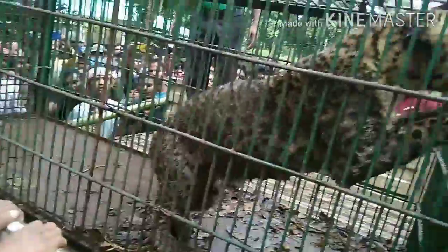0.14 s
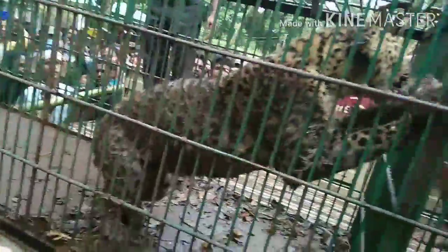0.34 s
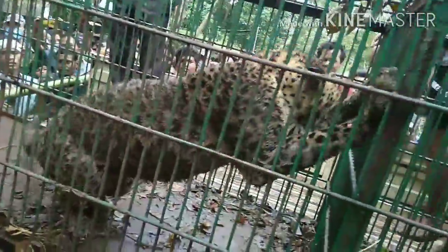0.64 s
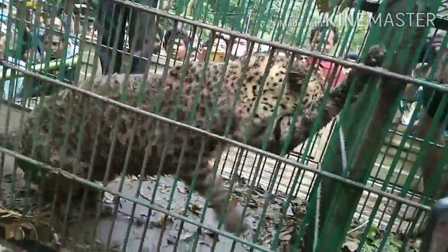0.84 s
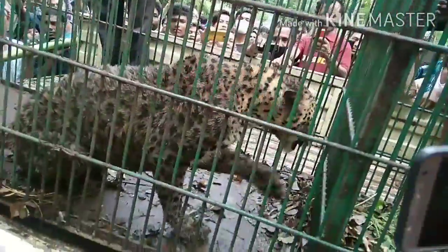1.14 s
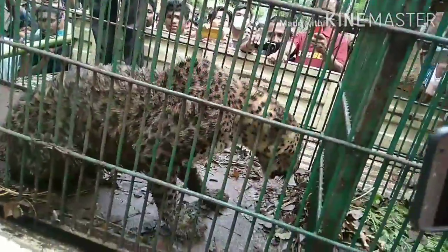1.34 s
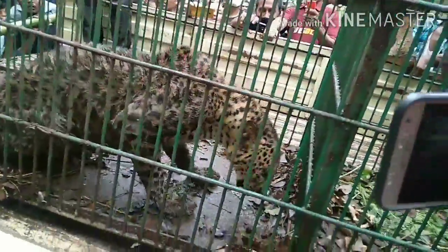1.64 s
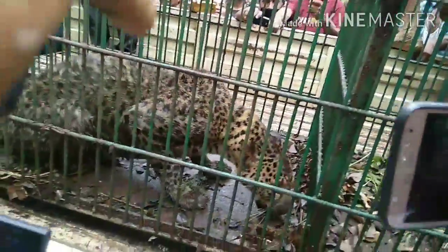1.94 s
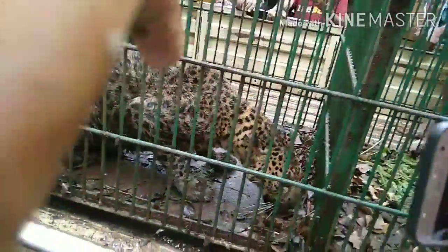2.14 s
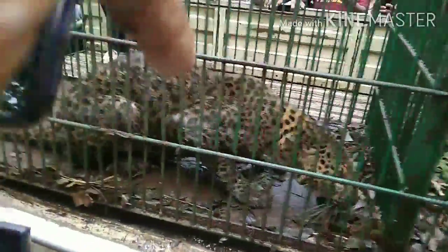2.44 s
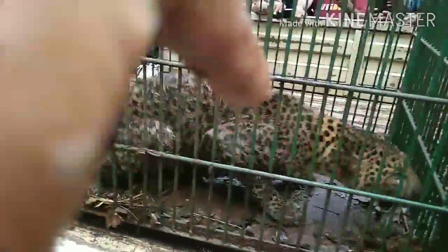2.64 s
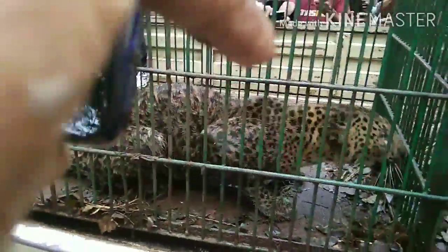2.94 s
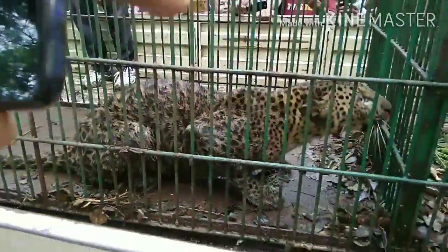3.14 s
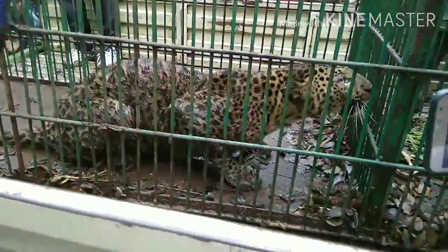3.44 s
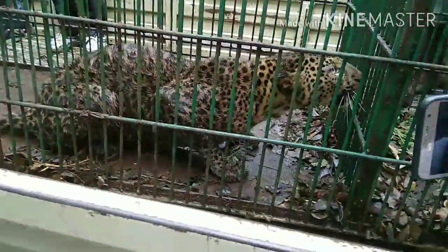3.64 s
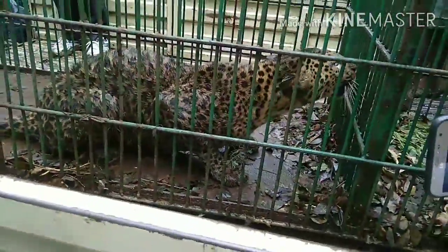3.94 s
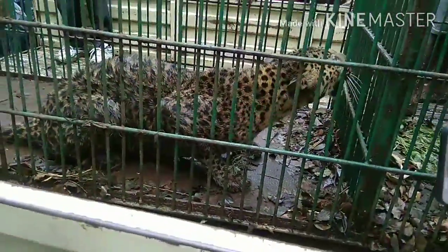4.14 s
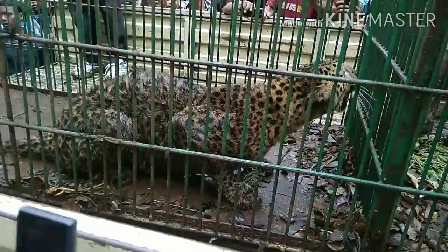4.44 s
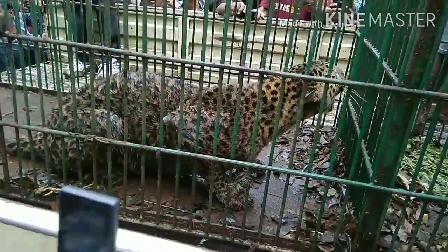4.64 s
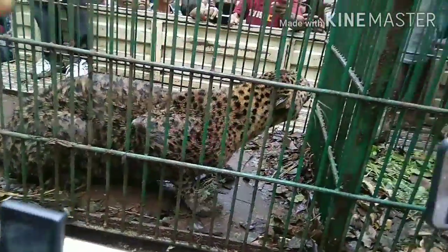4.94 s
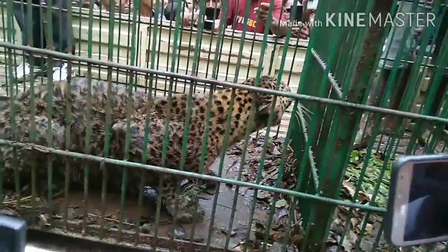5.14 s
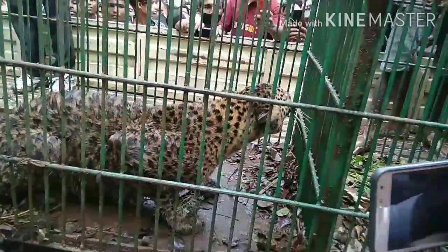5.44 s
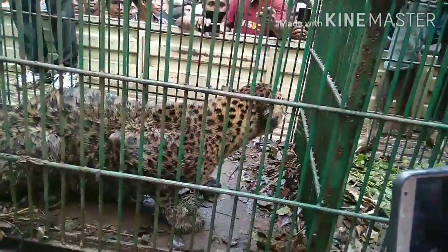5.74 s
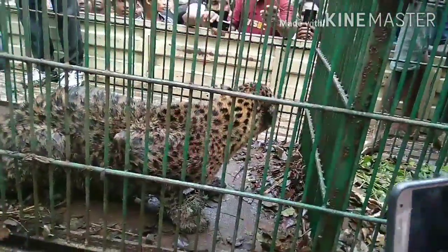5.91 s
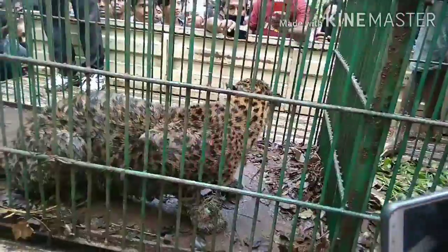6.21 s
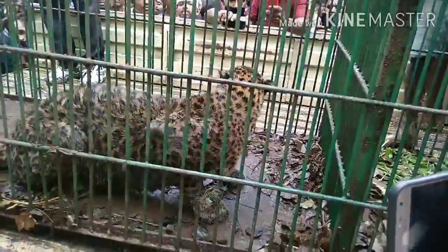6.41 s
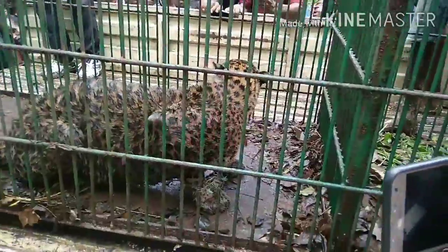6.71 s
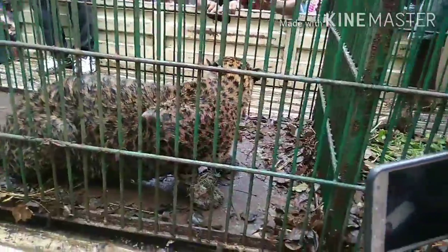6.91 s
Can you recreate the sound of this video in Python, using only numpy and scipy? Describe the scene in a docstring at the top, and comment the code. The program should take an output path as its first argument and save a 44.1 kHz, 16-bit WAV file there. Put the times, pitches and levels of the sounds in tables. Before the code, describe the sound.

A big cat very close to a dull, easily overloaded microphone snarls low, then rasps again more weakly. After a quieter breathy growl it erupts into a loud, distorted roar, follows with a second harsh snarl, and subsides into low growling and a pulsing rumble. The sound drops out completely for most of a second before one last rising snarl. Hard surroundings add a short echo over faint hiss.

```python
"""A snarl comes first, then more snarls, roars, growls and rumbles from a caged big cat.
It is close to the microphone in a hard-walled space that adds a short echo, over a faint steady hiss.
Turbulent air, chopped by the flapping vocal folds, rings in chest, throat and mouth; gliding sines are
the resonances that lock into tones, and the shape of the tract changes with each phrase.
The sound is dull above 5 kHz, overloads at the roar and cuts out for most of a second before the last snarl."""
import sys
import numpy as np
from scipy import signal
from scipy.fft import rfft, irfft, next_fast_len
from scipy.io import wavfile
from scipy.ndimage import uniform_filter1d, map_coordinates

SR = 44100
rng = np.random.default_rng(int(sys.argv[2]) if len(sys.argv) > 2 else 0)


def to_wav(sig):
    """Store sig (one row per channel, or 1-D mono) as 16-bit WAV at the path in sys.argv[1].

    Samples outside -1..1 are clipped; the rate is SR.
    """
    pcm = np.clip(np.atleast_2d(sig), -1, 1) * 32767
    pcm = np.round(pcm).astype(np.int16)
    wavfile.write(sys.argv[1], SR, pcm.T)  # frames by channels


N = 311779
T = np.arange(N) / SR  # time of each sample, s
M = next_fast_len(N + 8192)  # padded length for filtering, samples
FINE_HZ = np.fft.rfftfreq(M, 1 / SR)


def amp(db):
    """Decibels to an amplitude factor."""
    return 10 ** (np.asarray(db) / 20)


def along(points, hz):
    """Read a curve of (Hz, value) points on a logarithmic frequency axis."""
    point_hz, value = np.transpose(points)
    return np.interp(np.log(hz + 1), np.log(point_hz + 1), value)


def curves(rows):
    """One value per sample for each column after the time."""
    time_s, *columns = np.transpose(rows)
    return [np.interp(T, time_s, column) for column in columns]


def wobble(rate):
    """A smooth random curve with the given number of knots a second."""
    knots = rng.standard_normal(int(N * rate / SR) + 4)
    return map_coordinates(knots, [T * rate])


def causal(gain):
    """Minimum-phase response with the given gain: the ringing follows its cause, as in a real cavity."""
    cepstrum = irfft(np.log(gain + 1e-6))
    cepstrum[1:len(gain) - 1] *= 2
    cepstrum[len(gain):] = 0
    impulse = irfft(np.exp(rfft(cepstrum)))
    return rfft(impulse, M)


# Colour of the steady background; only its shape counts.
# Columns: frequency_hz [Hz], relative_level_db [dB per Hz]
HISS_COLOUR = [(15, -39.5), (25, -5.5), (310, -18), (387, -5), (628, -8.5), (915, -6.5), (1330, -18.5),
               (3150, -20.5), (4900, -35.5), (6370, -73.5), (10800, -120)]


def hiss(level_db=-52):
    """A faint steady background: random noise coloured by a fixed spectrum."""
    white = rfft(rng.standard_normal(N), M)
    noise = irfft(white * amp(along(HISS_COLOUR, FINE_HZ)), M)[:N]
    return amp(level_db) * noise / noise.std()


# How long the hard walls keep ringing.
# Columns: frequency_hz [Hz], t60_s [s to fall by 60 dB]
WALL_DECAY = [(150, 0.52), (1000, 0.28), (4000, 0.12)]


def walls(sound):
    """The diffuse answer of the walls: decaying noise in which each frequency dies at its own speed."""
    hz, t, noise = signal.stft(rng.standard_normal(SR), SR, nperseg=256)
    t60_s = along(WALL_DECAY, hz)[:, None]
    tail = signal.istft(noise * amp(-60 * t / t60_s), SR, nperseg=256)[1]
    tail /= np.linalg.norm(tail)
    late = np.pad(sound, (300, 0))  # the answer starts 300 samples (7 ms) late
    return signal.fftconvolve(late, tail)[:N]


# Stretches where one resonance of the cat locks into a wavering tone.
# Columns: start_s [s], length_s [s], first_hz [Hz], last_hz [Hz], peak_db [dB]
LOCKED_TONES = [(0.329, .16, 170, 162.7, -29.5), (0.389, 0.073, 989, 960, -21),
                (0.456, 0.026, 960, 950, -14), (0.473, .16, 284, 297, -31.5), (0.483, 0.236, 881, 908, -30),
                (0.806, 0.17, 920, 876, -35), (0.936, 0.14, 406, 374, -41.5),
                (1.176, 0.61, 2210, 2170, -59), (1.69, 0.14, 160, 167.7, -33.5),
                (1.886, 0.11, 167, 162, -37), (2.13, 0.16, 206, 221.6, -25.5),
                (2.202, .12, 930, 874, -18.5), (2.203, 0.18, 570, 529, -17), (2.38, .3, 284.2, 293.9, -12),
                (2.417, 0.11, 565, 585, -13), (2.441, .36, 794, 734.4, -20.5),
                (2.49, 0.11, 206, 219.3, -12), (2.524, 0.12, 520, 506, -19),
                (2.582, 0.11, 1024, 1019, -16.5), (2.687, .09, 334.9, 355.8, -10),
                (3.454, 0.078, 920, 944, -27.5), (3.529, 0.24, 985, 1008, -21.5),
                (3.607, 0.16, 328, 345.7, -22), (4.2, 0.3, 149.3, 159, -30.5),
                (4.496, 0.11, 160, 161, -33.5), (4.683, 0.072, 168.3, 173, -36),
                (6.826, 0.19, 155, 148, -24.5), (1.976, 0.047, 1515, 1480, -47.5),
                (2.08, .07, 886, 900, -35), (2.8, 0.24, 320, 290, -25.5), (3.323, 0.17, 1141, 1150, -30),
                (4.884, 0.098, 427, 420, -29.5)]


def tones(flutter_db=2.5, waver=0.015, swell_power=0.7):
    """Each locked resonance sings as a fluttering, gliding sine that swells and fades."""
    out = np.zeros(N)
    for start_s, length_s, first_hz, last_hz, peak_db in LOCKED_TONES:
        progress = np.clip((T - start_s) / length_s, 0, 1)
        glide_hz = first_hz + (last_hz - first_hz) * progress
        pitch_hz = glide_hz * (1 + waver * wobble(60))
        swell = np.abs(np.sin(np.pi * progress)) ** swell_power
        level = amp(peak_db + flutter_db * wobble(50))
        out += swell * level * np.sin(2 * np.pi * np.cumsum(pitch_hz) / SR)
    return out


# How the cat voices each phrase, one row per tract shape.
# Columns: chest_db, mouth_db, teeth_db [dB over throat], lowest_hz [Hz, foot of the chest sound],
# flap_rate_hz [flaps a second], flap_depth [0-1], timing_scatter [cycles]
PHRASE_VOICING = [(-9.5, -12, -19, 50, 54, 0.3, 0.087), (-13.5, -5.5, -11.5, 116, 40, 0.17, .35),
                  (-18, -2, -10.5, 116, 50, 0, 0.26), (1, -5, -11.5, 104, 47, .42, 0.43),
                  (2.5, -10.5, -24.5, 90, 41, .48, .23), (-3.5, -6, -20.5, 122, 55, 0.2, 0.12),
                  (-5, -4.5, -17, 120, 57, 0.1, .27), (-12, -7.5, -14, 140, 50, .18, .33),
                  (-9, -8, -15, 112, 42, .08, 0.21), (-15, -3.5, -17, 80, 45, 0, 0.25),
                  (-13.5, -4.5, -8, 83, 45, 0.18, 0.44), (-2, -7.5, -15, 98, 50, 0.2, 0.14),
                  (-1, -11.5, -17, 70, 46, 0.47, .05), (-4.5, -11, -23, 71, 44, 0.08, 0.3),
                  (-11, -3, -21, 107, 42, 0.69, 0.0276), (-12.5, 0, -21, 107, 39, 0.73, 0.026),
                  (-2.5, -5.5, -19, 128, 72, 0.4, .14)]


def held(column):
    """A column of the phrase table, held through each phrase and blended at the joins."""
    starts = [shape[0] for shape in TRACT_SHAPES]
    row = np.searchsorted(starts, T, side="right") - 1
    return uniform_filter1d(np.array(PHRASE_VOICING)[row, column], size=SR // 15)


def flap_cycles(rate):
    """Running count of the flaps: the phrase's own rate, except in the rumble, whose flaps are timed and slow down."""
    first_s, period_s = 5.2, 0.023  # flap number 0 of the rumble and the spacing of its steady flaps
    steady_flaps, slowing_s = 6, 0.000162  # the slowing grows as the square of the later flaps
    count = np.arange(-5, 31)
    flap_s = first_s + period_s * count + slowing_s * np.maximum(count - steady_flaps, 0) ** 2
    rumbling = (T > flap_s[0]) & (T < flap_s[-1])
    # 900 only keeps the rumble's random draws apart from those of the other flaps
    return np.where(rumbling, np.interp(T, flap_s, count) + 900, np.cumsum(rate) / SR)


def folds(burst_s=0.0032, delay_s=0.002, size_db=0.1, rasp_db=1.5, snap=0.29,
          knock=1.5, knock_hz=1080, spread=0.17):
    """Air noise that bursts at every flap of the folds and rasps in between."""
    rate, depth, scatter = held(column=4), held(column=5), held(column=6)
    cycles = flap_cycles(rate) + scatter * wobble(30)
    flap = np.round(cycles).astype(int)
    since_s = (cycles - flap) / rate - delay_s
    size, pitch, ratio = rng.standard_normal((1000, 3))[flap % 1000].T

    # each burst rises faster than it falls
    width_s = np.where(since_s < 0, 0.55 * burst_s, burst_s)
    burst = amp(size_db * size) * np.exp(-(since_s / width_s) ** 2)
    depth = np.clip(depth, 0, 1)
    rasp = amp(rasp_db * (1 - depth) * wobble(140))
    gate = (1 - depth + 3 * depth * burst) * rasp
    mean = np.sqrt(np.abs(uniform_filter1d(gate ** 2, size=SR // 12)))

    # part of each burst is the flow itself
    flow = snap * depth * (gate - uniform_filter1d(gate, size=SR // 30))
    # every slap of the folds knocks at two pitches of its own
    turn = 2 * np.pi * knock_hz * np.exp(spread * pitch) * since_s
    second_turn = 2.3 * np.exp(spread * ratio) * turn
    slap = knock * depth ** 2 * burst * (np.sin(turn) + 0.54 * np.sin(second_turn))
    return (gate * rng.standard_normal(N) + flow + slap) / mean


# Breath effort, one list of rows per call, as the level in the throat before the cat's overall trim.
# Columns: time_s [s], level_db [dB]
BREATH_EFFORT = [
    [(0.012, -21.5), (0.066, -27.5), (0.268, -37), (0.33, -37)],
    [(0.79, -42), (0.808, -33.5), (0.814, -29), (0.94, -28.5), (0.944, -35.5), (1.12, -53.5)],
    [(4.868, -44), (4.88, -25.5), (4.944, -25), (4.98, -34), (5.096, -46), (5.16, -52)],
    [(6.787, -37), (6.907, -20.5), (6.989, -20), (7.017, -17.5), (7.043, -16.5), (7.07, -19)],
    [(0.335, -37.5), (0.375, -33), (0.439, -23), (0.457, -24.5), (0.461, -23), (0.527, -24.5),
     (0.591, -26.5), (0.733, -36), (0.785, -36.5)],
    [(1.13, -49.5), (1.23, -48.5), (1.266, -43), (1.59, -49.5), (1.644, -42), (1.654, -48), (1.766, -45),
     (1.898, -50.5), (2.06, -40.5)],
    [(2.39, -23.5), (2.396, -11.5), (2.486, -7), (2.742, -10.5), (2.84, -21), (2.854, -16), (2.862, -19.5),
     (2.916, -24.5), (3.22, -35)],
    [(3.23, -38.5), (3.246, -33), (3.52, -18), (3.53, -21.5), (3.702, -19), (3.848, -35), (3.862, -31),
     (3.87, -36.5), (3.95, -38)],
    [(2.07, -35), (2.128, -33), (2.135, -21), (2.16, -26), (2.23, -13), (2.35, -11.5), (2.378, -25),
     (2.385, -18)],
    [(3.96, -39), (4.05, -31.5), (4.3, -31.5), (4.5, -35.5), (4.68, -39), (4.73, -34.5), (4.79, -39.5),
     (4.862, -49)],
    [(5.17, -46.5), (5.3, -46.5), (5.6, -47), (5.97, -50)],
]
# How far the jaws open beyond the phrase's shape, as extra level in mouth and teeth.
# Columns: time_s [s], extra_db [dB]
JAW_OPENING = [(0, 0), (.1, -1.5), (.36, 1.5), (.44, -0.5), (.56, -0.5), (.75, 6), (.82, 0), (.91, 5.5),
               (.96, -1), (1.05, -3), (2.07, -3), (2.23, 1), (2.38, 0), (2.46, 1.5), (2.71, -1),
               (3.22, -5.5), (3.3, 1), (3.68, 0.5), (3.85, -2.5), (4.75, 2), (4.88, 2), (5.14, -1.5),
               (5.2, -2.5), (5.48, 3.5), (5.97, 0), (6.79, 2), (6.83, -1.5), (7.07, 2)]
# What each part gains on the throat as the effort rises above its running mean.
# Columns: chest, mouth, teeth [dB per dB]
EFFORT_GROWTH = (-0.06, 0.055, .05)


def part_levels(drift_db=1.5):
    """Levels of chest, throat, mouth and teeth: effort drives all four, and all but the throat drift on their own."""
    points = sorted(tuple(row) for call in BREATH_EFFORT for row in call)
    throat_db, = curves(points)
    push_db = throat_db - uniform_filter1d(throat_db, size=SR // 3)
    jaws_db, = curves(JAW_OPENING)
    over_throat_db = []
    for part, jaw_share in enumerate((0, 1, 1)):  # chest, mouth, teeth
        effort_db = EFFORT_GROWTH[part] * push_db
        over_throat_db.append(jaw_share * jaws_db + held(part) + effort_db + drift_db * wobble(12))
    chest_db, mouth_db, teeth_db = over_throat_db
    return amp(throat_db + np.array([chest_db, 0 * T, mouth_db, teeth_db]))


# Treble and bass response of the microphone to the voice; it shapes the sound within each part.
# Columns: frequency_hz [Hz], gain_db [dB]
MICROPHONE_RESPONSE = [(20, -4.5), (60, -4.5), (120, 3.5), (2700, -5), (3500, -12), (4300, -19),
                       (5000, -28), (5500, -34), (6200, -100)]


def tract_gain(valley_db, slope_db, modes, lowest_hz):
    """Resonant peaks of the tract standing on a sloping valley floor, as the microphone hears them."""
    hz = np.fft.rfftfreq(8192, 1 / SR)
    octaves = np.log2(np.maximum(hz, 250) / 500)
    power = amp(valley_db + slope_db * octaves) ** 2
    for centre_hz, width_hz, peak_db in modes:
        offset = 0.91 * (hz - centre_hz) / width_hz
        power += amp(peak_db) ** 2 / (1 + offset ** 2) ** 2
    power *= 0.0088 + 1 / (1 + (lowest_hz / (hz + 1)) ** 14)  # little is left below the chest
    return np.sqrt(power) * amp(along(MICROPHONE_RESPONSE, hz))


# Shape of the cat's tract in each phrase; levels are relative within a phrase.
# Columns: start_s [s], valley_db [dB at 500 Hz], slope_db [dB per octave],
# resonances as (centre_hz [Hz], nominal width_hz [Hz], peak_db [dB])
TRACT_SHAPES = [(0, -19, -2.5, [(171.5, 30, 13), (391, 73, -7.5), (773, 160, -10), (1240, 78, -21),
                (1640, 38, -41.5), (2130, 97, -25.5), (2810, 94, -36.5)]),
                (0.332, -15, -1, [(167.4, 33, -1.5), (290, 10.5, -15), (448, 39, -11.5), (915, 54, 0),
                (1156, 24, -5), (1660, 66, -5.5), (1850, 36, -10), (2350, 300, -2.5), (3020, 30, -10.5)]),
                (.78, -15.5, 0, [(412, 55, -2.5), (914, 100, 1.5), (1152, 34, 1.5), (1690, 140, -3.5),
                (1910, 35, -22.5), (2310, 260, -1.5), (3090, 76, -5.5), (3460, 83, -17)]),
                (1.159, -14, -0.5, [(139, 59, -4), (357, 26, 0), (926, 69, -20.5), (1270, 70, -10.5),
                (2167, 64, -1), (2680, 120, -9)]), (1.747, -20, -2.5, [(175, 48, -5.5), (480, 27, -7),
                (904, 30, -21), (1420, 59, -22), (2130, 220, -14), (2700, 81, -30), (3430, 110, -41.5)]),
                (2.039, -14, -4, [(184, 41, 9.5), (460, 23, -2), (665, 61, -1), (923, 69, 6),
                (1605, 55, -11.5), (2260, 55, -17.5), (2380, 30, -20), (2590, 30, -16.5)]),
                (2.2, -9, -0.5, [(208, 54, -8), (520, 116, 0), (943, 27, -2), (1250, 55, -20.5),
                (1553, 100, -12), (2233, 42, -1)]), (2.392, -11, -1.5, [(296.6, 22, 1.5), (582, 31, -8),
                (777, 46, -2.5), (1056, 52, -11), (1694, 70, -15.5), (2820, 110, -25), (3730, 34, -25)]),
                (2.67, -6.5, -6.5, [(319, 25, -1), (751, 72, -2.5), (992, 19, -10.5), (1790, 79, -13.5),
                (2130, 140, -18.5), (2485, 120, -15.5), (3015, 36, -19), (3350, 43, -33.5),
                (3510, 45, -26.5)]), (3.221, -11, 3.5, [(193, 9.1, -10.5), (403, 53, -1), (933, 43, 2),
                (1144, 21, -13), (1710, 130, -1.5), (2450, 190, 7.5), (3090, 76, 5), (3380, 52, -15.5),
                (3780, 29, -31.5)]), (3.519, -8, -4.5, [(338, 35, 4), (932, 114, 0.5), (1186, 23, -3),
                (1694, 160, -4.5), (2000, 43, -4.5), (2200, 37, -4.5), (2470, 185, -5), (3070, 41, -12.5),
                (3980, 38, -27)]), (3.97, -18.5, -4, [(139, 86, -1), (394, 80, -4.5), (885, 140, -4),
                (1297, 34, -11), (2180, 97, -19.5), (2660, 88, -24.5), (3080, 100, -24)]),
                (4.388, -18, 2, [(174.5, 38, -3.5), (436, 62, -8), (937, 52, -7.5), (1300, 70, -16.5),
                (2010, 130, -7.5), (2630, 70, -24), (3130, 120, -5)]), (4.86, -12.5, -0.5, [(169, 30, 1),
                (441, 25, -3), (900, 96, -5), (1210, 15, -24), (1670, 51, -7), (1850, 23, -7),
                (2130, 66, -7.5), (2380, 48, -3)]), (5.14, -9.5, -2.5, [(136, 42, -2), (483, 23, 4.5),
                (840, 91, 3.5), (1060, 52, 0.5), (1285, 45, -2), (1880, 120, -12), (2810, 67.7, -23)]),
                (5.62, -11.5, -1.5, [(279.5, 60, 4.5), (510, 42, 2.5), (820, 230, 1), (1324, 44, -0.5),
                (1793, 140, -9), (2870, 45, -23)]), (6.4, -15.5, 1, [(154.4, 6.7, -3), (450, 71, -9),
                (672, 44, -3.5), (909, 70, -6.5), (1665, 97, -7.5), (2460, 223, -4.5), (2894, 42, -17.5),
                (3116, 104, -19)])]
# Borders between the four parts of the voice.
# Columns: chest_to_throat_hz, throat_to_mouth_hz, mouth_to_teeth_hz [Hz]
PART_BORDERS = (260, 1400, 2900)


def voice():
    """The fold noise rings through each tract shape in turn; chest, throat, mouth and teeth swell separately."""
    levels = part_levels()
    source = rfft(folds(), M)
    below = [1 / (1 + (FINE_HZ / border_hz) ** 8) for border_hz in PART_BORDERS]
    parts = np.array([below[0], below[1] - below[0], below[2] - below[1], 1 - below[2]])
    ends = [shape[0] for shape in TRACT_SHAPES[1:]] + [N / SR + 1]
    out = np.zeros(N)
    for (start, valley_db, slope_db, modes), end, phrase in zip(TRACT_SHAPES, ends, PHRASE_VOICING):
        gain = tract_gain(valley_db, slope_db, modes, lowest_hz=phrase[3])
        rung = irfft(source * causal(gain) * parts, M)
        # neighbouring phrases cross over 40 ms; the first one starts at full level
        a = max(round((start - .02) * SR), 0)
        b = min(round((end + .02) * SR), N)
        t = T[a:b]
        opening = (start == 0) * (t < .1)
        fade = np.clip(np.minimum(t - start, end - t) / .04 + .5 + opening, 0, 1)
        rung = rung[:, a:b]
        rung = rung / rung.std(axis=1, keepdims=True)
        out[a:b] += np.sqrt(fade) * np.sum(rung * levels[:, a:b], axis=0)
    return out


def scene():
    """The cat close by, its echo from the walls and the background hiss."""
    cat = amp(-2.5) * voice() + tones()
    return (cat + amp(-11.5) * walls(cat) + hiss())[None]


# The stretch in which the sound cuts out.
# Columns: from_s [s], to_s [s]
CUT_OUT = (5.976, 6.787)


def record(dry, dull_hz=5300, bass_cut_hz=59, top_hz=15850):
    """A dull input stage saturates; the sound cuts out for a while, peaks clip and the band ends at top_hz."""
    squeezed = dry / (1 + np.abs(dry / 1.1) ** 12) ** (1 / 12)
    band = 1 / (1 + (FINE_HZ / dull_hz) ** 24)
    band *= .5 + .5 / (1 + (bass_cut_hz / (FINE_HZ + 1)) ** 6)  # the deepest bass is halved
    dull = irfft(rfft(squeezed, M) * band, M)[:, :N]
    on = np.clip(np.maximum(CUT_OUT[0] - T, T - CUT_OUT[1]) / .001, 0, 1)  # 1 ms edges
    clipped = np.clip(dull * on, -.985, .985)
    return irfft(rfft(clipped, M) * (FINE_HZ < top_hz), M)[:, :N]


dry = scene()
out = record(dry)
to_wav(out)
```